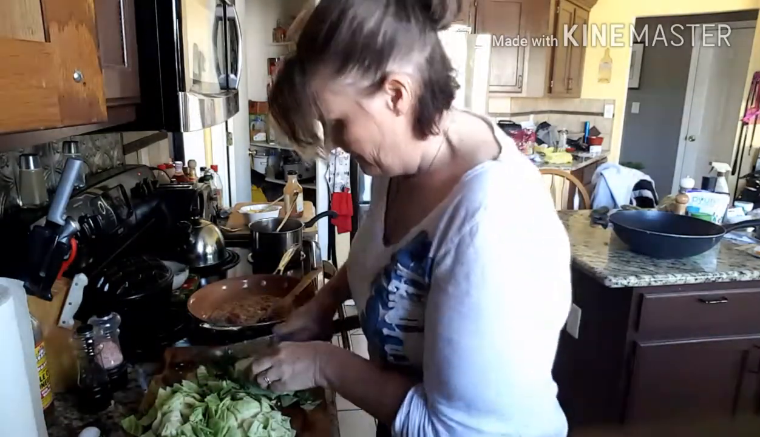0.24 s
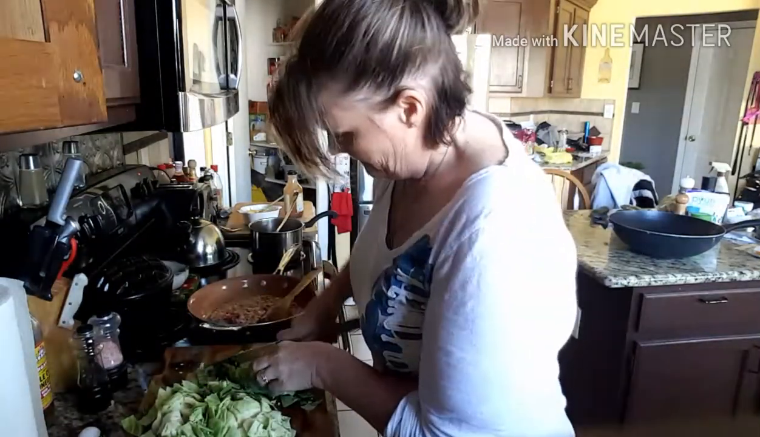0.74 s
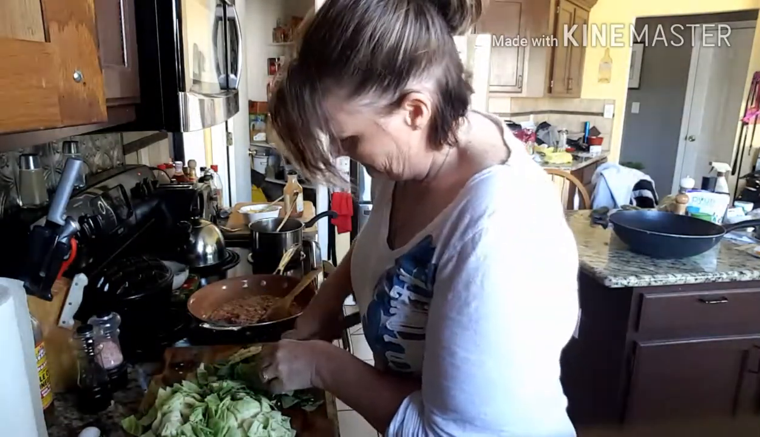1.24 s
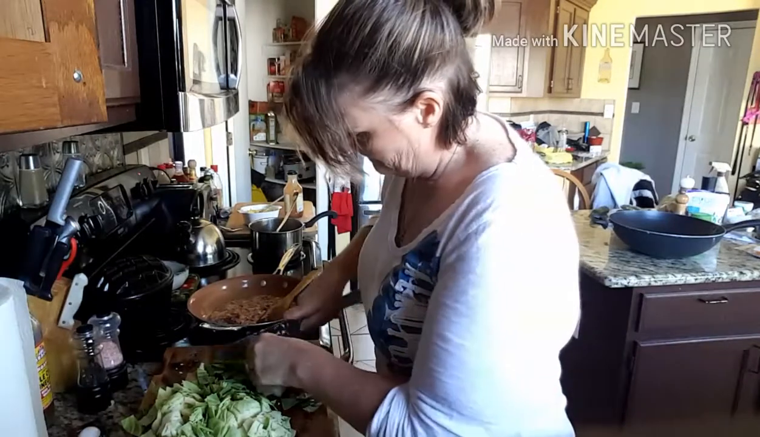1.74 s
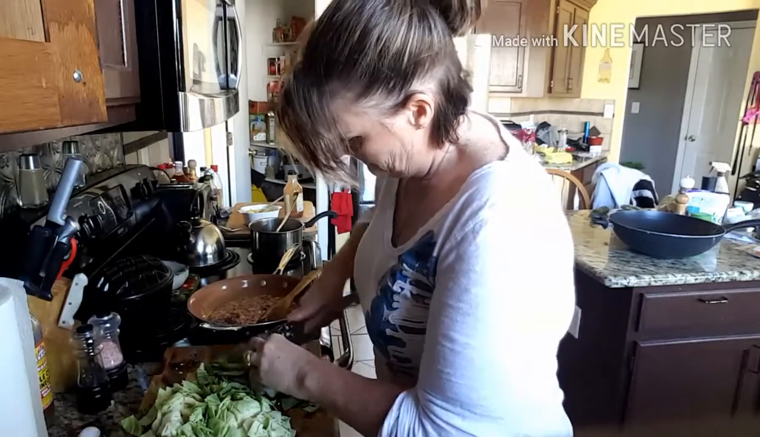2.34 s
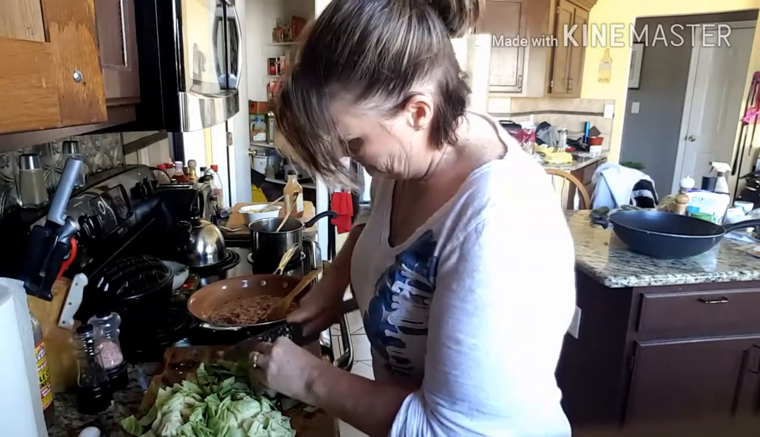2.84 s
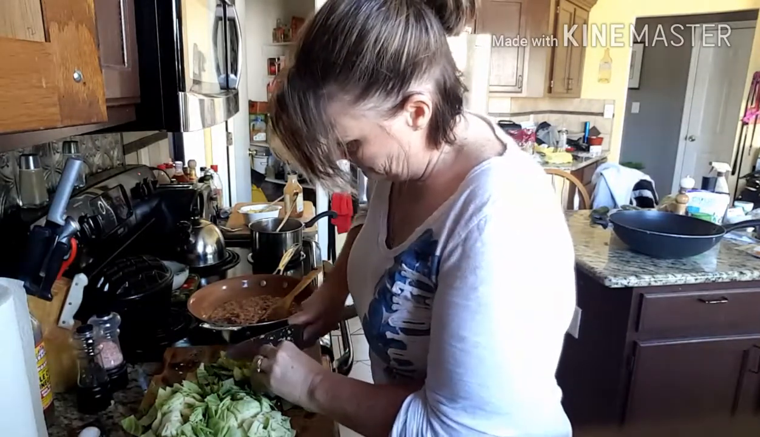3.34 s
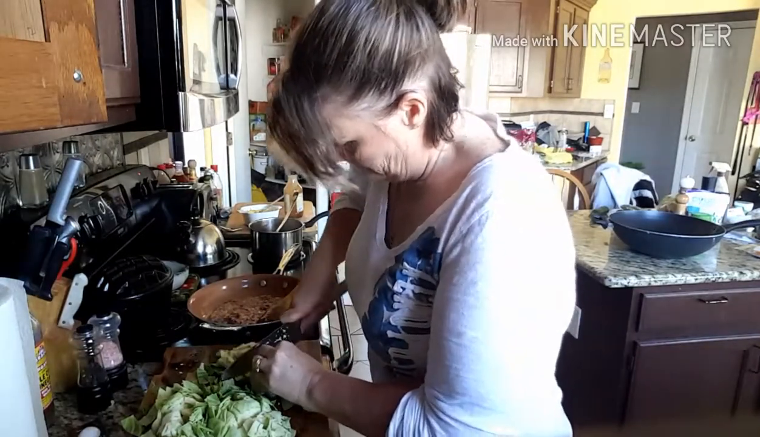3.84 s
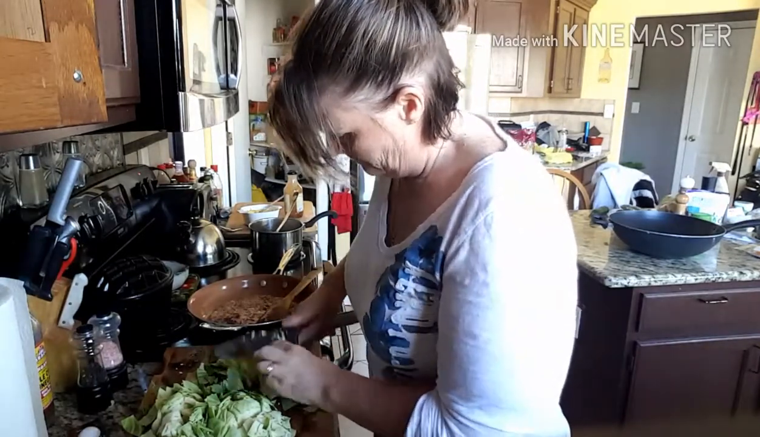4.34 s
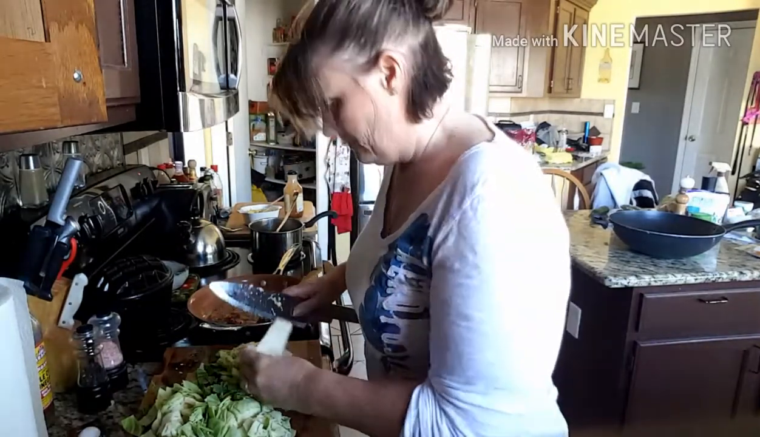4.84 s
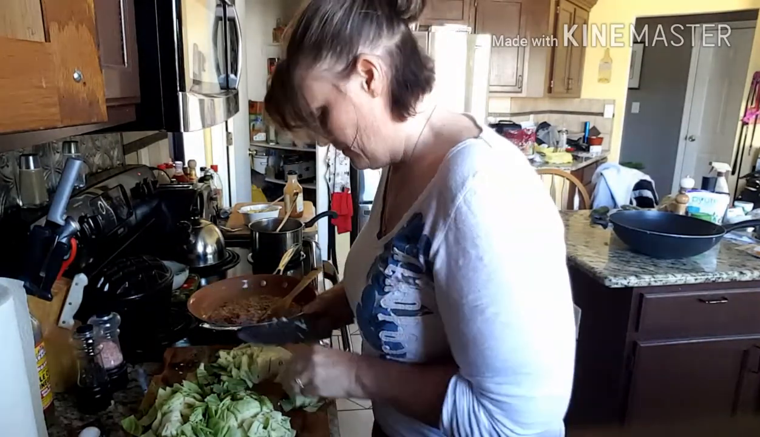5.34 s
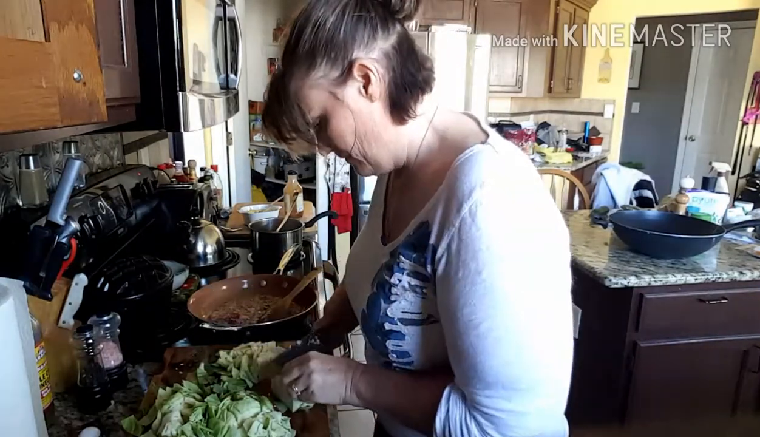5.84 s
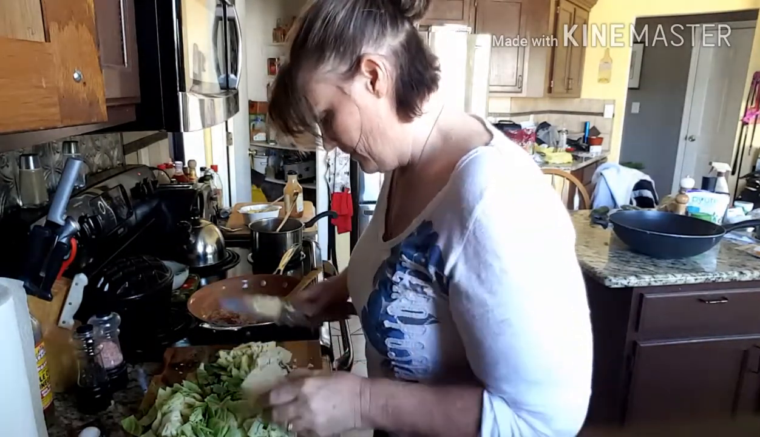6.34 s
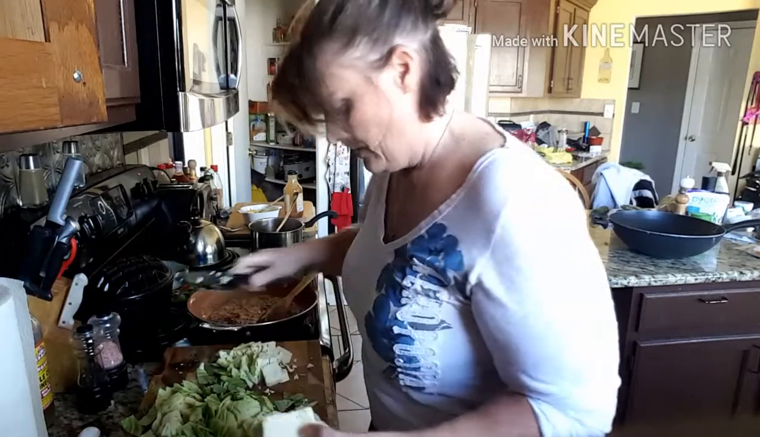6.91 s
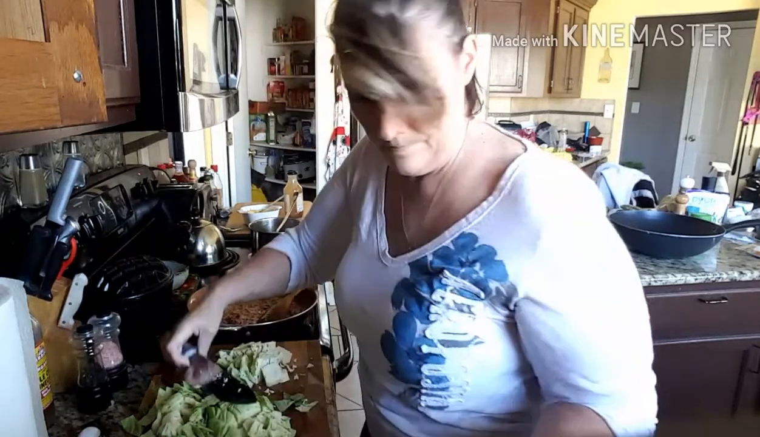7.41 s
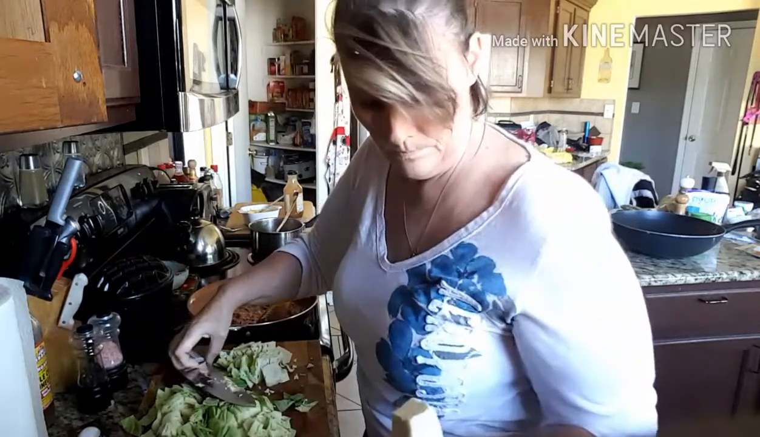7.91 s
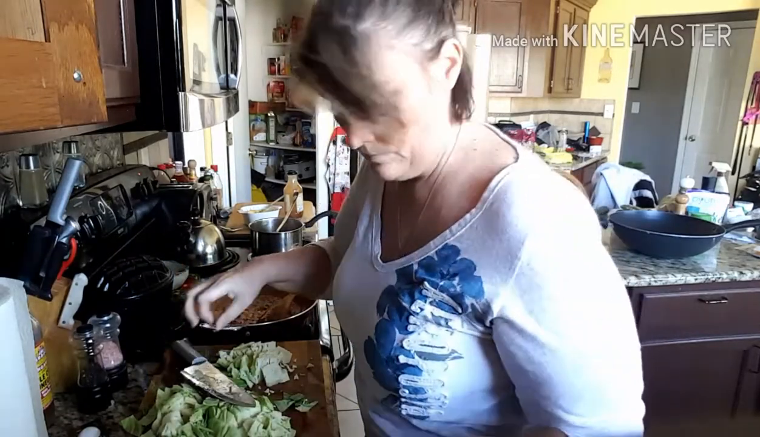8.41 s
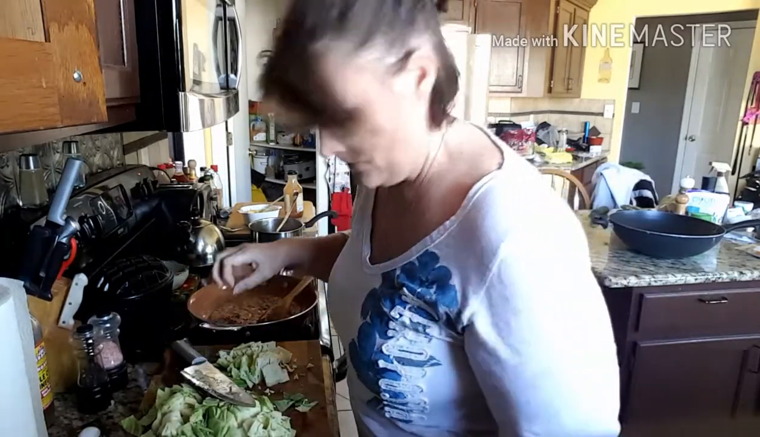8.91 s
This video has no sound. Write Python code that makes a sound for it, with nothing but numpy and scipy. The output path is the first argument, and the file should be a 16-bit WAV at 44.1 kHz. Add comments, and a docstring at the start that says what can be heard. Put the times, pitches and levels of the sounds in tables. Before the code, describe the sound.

Close in a lively home kitchen, a heavy knife chops cabbage on a wooden board: six sharp, woody knocks a little over half a second apart, most preceded by a dull landing on the leaves and a short crunch. Two slower chops follow with rustles and snaps between. Then the flat blade claps down, scrapes briefly and settles with small taps. A low appliance hum and airy hiss continue underneath.

```python
"""A large knife chops cabbage on a wooden board in a home kitchen, quickly at first, then more slowly, and is laid down.
Each stroke drives resonances of board and bench with a short force pulse; most follow a dull landing on the leaves.
Bursts of random clicks make the leaves crunch, snap and crackle; filtered noise makes the appliance's hum and rumble.
Echoes and decaying noise form the kitchen. The left microphone port is nearer, but duller."""
import sys
import numpy as np
from scipy import signal
from scipy.fft import rfft, irfft
from scipy.io import wavfile
from scipy.ndimage import uniform_filter1d

SR = 44100
rng = np.random.default_rng(int(sys.argv[2]) if len(sys.argv) > 2 else 0)


def store_pcm(level_fs):
    """Save levels as 16-bit WAV."""
    pcm = np.round(np.clip(level_fs, -1, 1) * 32767).astype(np.int16)
    wavfile.write(sys.argv[1], SR, np.atleast_2d(pcm).T)


N = 403956
TIME = np.arange(N) / SR

# strokes through the cabbage, timed where the blade meets the board:
# start_s, level_db, contact_cutoff_hz, board_flex_db, blade_clack_db, room_db, cutting_s, crunch_db
STROKES = [(0.1168, -12.5, 2490, -1.5, 5, -7.5, 0.021, -39.5), (0.7114, -5.5, 2600, 0, 1, -6, .028, -37.5),
           (1.2851, -3, 3290, -3.5, 6, -6.5, 0.04, -39), (1.89, -4.5, 2860, 1, 9, -5.5, 0.054, -44.5),
           (2.4539, -6, 3030, 1, 9, -3.5, .025, -38), (3.015, -3.5, 3640, -1, 12, -4, .054, -39),
           (3.9938, -7.5, 2920, 1, 2.5, -7, .066, -37), (5.9778, -9, 3380, 3, 7, -1.5, 0.052, -47)]
# resonances of the board under the edge: pitch_hz, width_hz, level_db
BOARD_MODES = [(228, 52, -14), (370, 23, -49), (508, 220, -10), (596, 128, -0.5), (796, 88, 3.5),
               (919, 101, 4), (1075, 75, 6), (1310, 880, -11.5), (1660, 490, -3.5), (2197, 333, -7),
               (2384, 590, -17.5), (2700, 400, -20.5), (3850, 190, -25), (3960, 2500, -26.5)]
# resonances of the knife lying flat: pitch_hz, width_hz, level_db
KNIFE_MODES = [(515, 132, 1), (793, 144, 9), (950, 510, 8), (1370, 190, 3), (1664, 190, 10),
               (2090, 165, 8.5), (2780, 450, 1.5), (4300, 550, 5.5)]
# knife or hand comes down on the cabbage, mostly to line up a stroke: start_s, bench_thump_db, leaf_snap_db
CABBAGE_LANDINGS = [(.055, -53, -34), (.571, -22.5, -34), (1.1239, -22, -32.5), (1.763, -47, -37),
                    (2.293, -36, -41), (2.858, -35, -37), (3.8848, -49, -29.5), (5.462, -29, -48),
                    (5.904, -40, -37)]
# the flat of the knife slaps or settles on the board: start_s, level_db, contact_cutoff_hz, leaf_snap_db
FLAT_SLAPS = [(.2305, -26, 1550, -36), (6.280, -27.5, 4500, -20), (7.5788, -10, 2280, -42),
              (8.002, -38.5, 2500, -39), (8.458, -33.5, 2980, -30), (9.056, -34, 5000, -18)]


def from_db(db):
    """Logarithmic level: 20 dB is a factor of ten in amplitude."""
    return 10 ** (np.asarray(db) / 20)


def rms_one(x):
    """Energy normalisation: scale to rms 1."""
    return x / np.sqrt(np.mean(x ** 2) + 1e-20)


def peak_one(x):
    """Peak normalisation: scale to peak 1."""
    return x / np.abs(x).max()


def at_hz(points, hz):
    """Logarithmic pitch scale: interpolate a table along log frequency."""
    known_hz, values = np.transpose(points)
    return np.interp(np.log(hz + 1), np.log(known_hz), values)


def add(track, s, sound):
    """Superposition: sum a sound into the track from a given second."""
    at = round(s * SR)
    track[..., at:at + sound.shape[-1]] += sound[..., :N - at]


def coloured(x, spectrum, size=4096):
    """Minimum-phase filtering: folding the cepstrum makes the response causal for a given spectrum."""
    log_gain = np.log(from_db(at_hz(spectrum, np.fft.rfftfreq(size, 1 / SR))))
    cepstrum = irfft(log_gain)
    cepstrum[1:size // 2] *= 2
    cepstrum[size // 2 + 1:] = 0
    response = irfft(np.exp(rfft(cepstrum)))
    return signal.oaconvolve(x, response)[:len(x)]


def resonate(x, modes):
    """Modal superposition: parallel damped resonances whose neighbours swing in opposite senses."""
    out = 0
    for hz, width, db in modes:
        r = np.exp(-np.pi * width / SR)   # pole radius: a wider resonance dies sooner
        poles = [1, -2 * r * np.cos(2 * np.pi * hz / SR), r * r]
        gain = from_db(db) * (1 - r * r) / 2
        out = gain * signal.lfilter([1, 0, -1], poles, x + 1e-18) - out
    return out


def chops(vary_db=1.28, detune=0.02):
    """Mode excitation: where and how flat the edge lands mixes flex and clack; returns knocks, room feed, bench."""
    # bench thud: level of a 0 dB chop; dB gained per dB of stroke level, lost per dB of clack
    thud_db, thud_follows, thud_per_clack = -22, 0.46, 0.29
    direct, to_room, bench = np.zeros((3, N))
    for s, level_db, cut_hz, flex_db, clack_db, room_db, _, _ in STROKES:
        weights = [(620, flex_db), (900, 0), (1150, 0), (2000, clack_db)]
        modes = []
        for hz, width, db in BOARD_MODES:
            mode_hz = hz * (1 + rng.normal(0, detune))
            mode_db = db + at_hz(weights, hz) + rng.normal(0, vary_db)
            modes.append((mode_hz, width, mode_db))
        knock = from_db(level_db) * struck(edge(cut_hz), modes)
        add(direct, s, knock)
        add(to_room, s, from_db(room_db) * knock)
        bench_db = thud_db + thud_follows * level_db - thud_per_clack * clack_db
        add(bench, s, from_db(bench_db) * thud(soft_hz=167))
    return direct, to_room, bench


def edge(cut_hz, seat_s=0.0039, seat_db=-13, count=4):
    """Multiple impact: the curved edge seats itself in a few further touches right after the first."""
    touches = signal.unit_impulse(SR // 20)
    for when, size in rng.random((count, 2)):
        touches[int(when * seat_s * SR) + 1] += from_db(seat_db) * (2 * size - 1)
    return signal.oaconvolve(contact(cut_hz, order=4), touches)


def contact(cut_hz, order=3):
    """Contact stiffness: the softer the contact, the lower the cut-off of the force pulse."""
    lowpass = signal.butter(order, min(cut_hz, SR / 3), fs=SR, output="sos")
    return signal.sosfilt(lowpass, signal.unit_impulse(SR // 3) + 1e-18)


def struck(force, modes, crack_db=-3):
    """Impact response: a body's ring joined by the short woody crack of the contact itself; peak 1."""
    crack = resonate(force, [(1180, 1120, 0)])
    return peak_one(peak_one(resonate(force, modes)) + from_db(crack_db) * peak_one(crack))


def thud(soft_hz):
    """Low-mode response: the bench gives way under a blow and swings a few times; peak 1."""
    # resonances of the bench under the board: pitch_hz, width_hz, level_db
    bench_modes = [(100.3, 21.4, -2), (145, 16, -26), (253, 21, -27)]
    return peak_one(resonate(contact(soft_hz, order=5), bench_modes))


def cabbage(landing_juicy_db=4.5):
    """Brittle fracture: leaves snap under the knife, crunch on its way to the board and rustle in the hand."""
    # thick ribs snap: start_s, level_db, low_crackle_db
    rib_snaps = [(.142, -24.5, -11), (1.867, -15.5, 9), (2.7666, -23.5, -8), (3.5527, -31.5, 1),
                 (4.2656, -34, -10), (4.752, -31, -10), (7.01, -31, -12), (7.238, -33.5, -9),
                 (7.833, -31.5, 1.5)]
    # the hand shifts the leaves: start_s, length_s, level_db
    leaf_shifts = [(2.376, 0.019, -43), (5.11, 0.036, -45.5), (5.452, 0.038, -47), (6.202, 0.032, -47),
                   (6.268, 0.022, -42), (6.622, 0.025, -45), (6.678, 0.033, -49.5)]
    crunch_juicy_db, rustle_juicy_db, slap_juicy_db = 4.5, -4, -0.5   # low crackle
    overrun_s = 0.0045   # the last leaves part just after the knock
    out = np.zeros(N)
    for s, *_, cutting_s, db in STROKES:
        add(out, s - cutting_s, from_db(db) * crunch(cutting_s + overrun_s, crunch_juicy_db))
    for s, length_s, db in leaf_shifts:
        add(out, s, from_db(db) * crunch(length_s, rustle_juicy_db))
    for s, _, db in CABBAGE_LANDINGS:
        add(out, s, from_db(db) * snap(landing_juicy_db))
    for s, *_, db in FLAT_SLAPS:
        add(out, s, from_db(db) * snap(slap_juicy_db))
    for s, db, juicy_db in rib_snaps:
        add(out, s, from_db(db) * snap(juicy_db))
    return out


def crunch(length_s, juicy_db, swell=0.41, release_s=0.0075, clump_db=2.0):
    """Progressive fracture: crackle swells in clumps as the leaves are pressed, and stops quickly."""
    t = np.arange(SR // 8) / SR
    release = np.exp(-np.maximum(t - length_s, 0) / release_s)
    bite = np.minimum(t / length_s, 1) ** swell * release
    unevenness = rms_one(uniform_filter1d(rng.standard_normal(len(t)), size=200))
    layers = from_db(clump_db * unevenness)   # leaf after leaf gives way
    return leaf(bite * layers * grains(t, per_s=3000, spread_db=1.9), juicy_db)


def snap(juicy_db, decay_s=0.0043, rise_s=0.0024):
    """Sudden fracture: one rib breaks in a brief burst of cells; peak 1."""
    t = np.arange(SR // 8) / SR
    burst = grains(t, per_s=14000, spread_db=2.5) * np.exp(-t / decay_s) * (1 - np.exp(-t / rise_s))
    rib_mode = (rng.uniform(5100, 8400), 1500, -2)   # every rib has a pitch of its own
    burst = burst + resonate(burst, [rib_mode])
    return peak_one(leaf(burst, juicy_db))


def grains(t, per_s, spread_db):
    """Random impulse process: bursting cells click at random moments with uneven sizes; rms 1."""
    size_db = spread_db * np.minimum(rng.exponential(1, len(t)), 4)
    sizes = from_db(size_db) * rng.choice([-1, 1], len(t))
    return rms_one(sizes * (rng.random(len(t)) < per_s / SR))


def leaf(clicks, juicy_db):
    """Spectral shaping by thickness: thin leaves sound crisp, thick ribs add a lower crackle."""
    # spectrum of thin leaves: pitch_hz, level_db
    crisp = [(300, -39.5), (1500, -7), (3000, 6.5), (6000, 5), (9000, 3.5), (16000, 1)]
    # spectrum of thick ribs: pitch_hz, level_db
    juicy = [(150, -9), (600, -12), (1200, -7.5), (2100, 0), (3400, -1), (6000, -12.5), (16000, -37)]
    return coloured(clicks, crisp) + from_db(juicy_db + 8.5) * coloured(clicks, juicy)


def thumps():
    """Soft impact: landings, taps and pushes excite mostly the lowest modes; returns board and bench."""
    # light taps on bare wood: start_s, level_db, contact_cutoff_hz
    wood_taps = [(3.186, -40.5, 494), (3.615, -39, 1080), (4.883, -45, 750), (7.077, -43, 1300),
                 (8.868, -42.5, 400), (8.888, -32.5, 480), (9.055, -30.5, 1230)]
    # the softer the tap, the more it moves the bench: contact_cutoff_hz, thump_over_knock_db
    tap_thump = [(400, 10.5), (500, 0.5), (1200, -10)]
    # knock through the leaves: cut-off, level under a 0 dB thump, dB per dB of thump
    landing_cut_hz, landing_knock_db, landing_growth = 447, 5, 1.74
    push_lead_s, push_db = 0.0331, -38.5   # the blade's push rocks the bench shortly before each knock
    board, bench = np.zeros((2, N))
    swing = thud(soft_hz=146)
    blows = []
    for s, thump_db, _ in CABBAGE_LANDINGS:
        blows.append((s, thump_db, landing_knock_db + landing_growth * thump_db, landing_cut_hz))
    for s, knock_db, cut_hz in wood_taps:
        blows.append((s, knock_db + at_hz(tap_thump, cut_hz), knock_db, cut_hz))
    for s, thump_db, knock_db, cut_hz in blows:
        knock = peak_one(resonate(contact(cut_hz, order=5), BOARD_MODES))
        add(board, s, from_db(knock_db) * knock)
        add(bench, s, from_db(thump_db) * swing)
    for s, *_ in STROKES:
        add(bench, s - push_lead_s, from_db(push_db) * swing)
    return board, bench


def slaps():
    """Plate impact: the side of the blade claps on the wood, exciting the knife's own modes, and bounces once."""
    bounce_s, bounce_db = 0.0064, -9.5
    out = np.zeros(N)
    for s, level_db, cut_hz, _ in FLAT_SLAPS:
        clap = from_db(level_db) * struck(contact(cut_hz, order=6), KNIFE_MODES)
        add(out, s, clap)
        add(out, s + bounce_s, from_db(bounce_db) * clap)
    return out


def slide(damping=1.6, dull_hz=2600):
    """Friction noise: the flat blade is pushed a little way over the board, which damps its ring, and stops."""
    start_s, attack_s, fade_db_per_s, level_db = 7.79, 0.11, 77, -50
    t = TIME - start_s
    fade = from_db(-fade_db_per_s * np.maximum(t - attack_s, 0))
    speed = np.clip(t / attack_s, 0, 1) * fade
    rubbing = signal.oaconvolve(rng.standard_normal(N), contact(dull_hz))[:N]
    damped_modes = [(hz, damping * width, db) for hz, width, db in KNIFE_MODES]
    return from_db(level_db) * speed * rms_one(resonate(rubbing, damped_modes))


def loose_leaves(crackle_db=-62, count=14):
    """Random relaxation: the heap crackles, with stray snaps while handled, and calms as it is let go."""
    handling_ends_s, fade_s, resting_share = 7.5, 0.64, 0.31   # left alone, the leaves crackle less
    stray_db, stray_spread_db, stray_juicy_db = -36, 6, -5   # small ribs that give way at random
    activity = np.interp(TIME, [handling_ends_s - fade_s, handling_ends_s], [1, resting_share])
    crackle = leaf(grains(TIME, per_s=170, spread_db=2.0), juicy_db=1.5)
    out = from_db(crackle_db) * activity * crackle
    for k, (when, size) in enumerate(rng.random((count, 2))):
        s = (k + when) / count * handling_ends_s
        snap_db = stray_db + stray_spread_db * (2 * size - 1)
        add(out, s, from_db(snap_db) * snap(stray_juicy_db))
    return out


def near_paths(scatter_db=-12, scatter_s=0.0007, dull_hz=3000, size=1024):
    """Propagation delay: direct sound is later at the right port; clutter scatter and duller echoes follow."""
    # echoes off worktop, cupboards and wall, each from its own side: delay_ms, right_later_ms, left_db, right_db
    echoes = [(1.95, 0.12, -10.5, -1.5), (4.9, 0.062, -9, -6), (7.55, -0.11, -5, -8)]
    right_lag_ms = 0.54
    hz, t = np.fft.rfftfreq(size, 1 / SR), np.arange(size) / SR
    per_ms = -2j * np.pi * hz / 10 ** 3   # phase turn of one millisecond's delay
    clutter = rng.standard_normal((2, size)) * t * np.exp(-2 * t / scatter_s)
    clutter = rms_one(clutter) / np.sqrt(size)
    paths = np.exp(per_ms * [[0], [right_lag_ms]]) + from_db(scatter_db) * rfft(clutter)
    for ms, later_ms, left_db, right_db in echoes:
        delays = np.exp(per_ms * [[ms], [ms + later_ms]])
        paths += from_db([[left_db], [right_db]]) * delays / (1 + 1j * hz / dull_hz)
    return irfft(paths)


def room_tail(build_s=0.0096, size=32768):
    """Diffuse-field decay: kitchen reverberation dies band by band; both ports share its bass."""
    # colour of the reverberation: pitch_hz, level_db
    room_colour = [(80, -11), (170, 0), (245, 7.5), (400, 1.5), (620, -5), (1050, -3), (2100, -4.5),
                   (3100, -6), (8000, -2), (15000, -4.5)]
    # time to fall by 60 dB: pitch_hz, decay_s
    decay_times = [(100, 0.39), (250, 0.33), (600, 0.41), (1100, 0.35), (2100, 0.44), (3200, 0.42),
                   (14000, 0.25)]
    t, hz = np.arange(size) / SR, np.fft.rfftfreq(size, 1 / SR)
    mid, side = np.exp(2j * np.pi * rng.random((2, len(hz))))
    alike = 1 / (1 + (hz / 800) ** 3)   # likeness of the two ports
    noise = np.sqrt(1 + alike) * mid + np.sqrt(1 - alike) * side * [[1], [-1]]
    centres, tail = [row[0] for row in decay_times], 0
    for (_, t60), weights in zip(decay_times, np.eye(len(centres))):
        band = irfft(noise * at_hz(list(zip(centres, weights)), hz))
        tail = tail + band * from_db(-60 * t / t60)
    tail = tail * (1 - np.exp(-(t / build_s) ** 2))   # gradual onset
    return np.array([coloured(rms_one(port), room_colour) for port in tail]) / np.sqrt(size)


def background(rumble_db=-56, hiss_db=-53, hum_width_hz=9.6):
    """Filtered noise: an appliance's rumble and wavering narrow-band hum, with an airy hiss unlike at each port."""
    # appliance rumble: pitch_hz, level_db
    rumble_spectrum = [(20, -37), (35, -12), (55, 2), (78, -1), (100, 7), (120, 0.5), (150, -9.5),
                       (260, -22), (400, -26), (560, -13), (900, -29), (2000, -54)]
    # airy hiss: pitch_hz, level_db
    hiss_spectrum = [(40, -5), (160, -18), (260, 2.5), (370, -1.5), (500, -7.5), (800, 6.5), (1300, -1.5),
                     (2000, 9.5), (3200, -1), (4500, 0.5), (9000, 2.5), (15000, -3.5)]
    # appliance hum: pitch_hz, level_db
    hum_tones = [(97, -76), (219, -71), (267, -71), (473, -67.5), (608, -74)]
    white = rng.standard_normal((4, N))
    rumble = from_db(rumble_db) * rms_one(coloured(white[0], rumble_spectrum))
    hum = sum(from_db(db) * rms_one(resonate(white[1], [(hz, hum_width_hz, 0)])) for hz, db in hum_tones)
    hiss = np.array([coloured(port, hiss_spectrum) for port in white[2:]])
    return rumble + hum + from_db(hiss_db) * rms_one(hiss)


def scene(room_db=5.0, leaf_room_db=-4.5, tap_room_db=-8.0, chop_boom_db=-3.0, thump_boom_db=-8.5):
    """Direct and reverberant fields: board sounds reach the ports by both; the bench booms alike in both ports."""
    knocks, knocks_to_room, hard_thuds = chops()
    soft_knocks, soft_thuds = thumps()
    leaves = cabbage() + loose_leaves()
    taps = soft_knocks + slaps() + slide()
    to_room = knocks_to_room + from_db(leaf_room_db) * leaves + from_db(tap_room_db) * taps
    to_room += from_db(chop_boom_db) * hard_thuds + from_db(thump_boom_db) * soft_thuds
    near = signal.oaconvolve((knocks + leaves + taps)[None], near_paths(), axes=1)[:, :N]
    far = signal.oaconvolve(to_room[None], room_tail(), axes=1)[:, :N]
    return near + hard_thuds + soft_thuds + from_db(room_db) * far + background()


def record(dry, low_cut_hz=38, top_cut_hz=15300):
    """Band limiting and soft saturation: coloured ports lose the deepest bass, high peaks are rounded, the top is cut."""
    # colour of the left microphone port: pitch_hz, level_db
    left_port = [(120, 0), (250, 3.5), (400, 8), (620, 2.5), (1100, 5.5), (1550, 0.5), (2000, -6.5),
                 (3000, 2), (4500, -0.5), (6500, -5), (8500, -19), (10500, -19), (13000, -7.5),
                 (16000, -36)]
    # colour of the right microphone port: pitch_hz, level_db
    right_port = [(120, 0), (250, 8.5), (400, 4), (620, 7.5), (1150, 0.5), (1550, 4.5), (2000, 0.5),
                  (3000, 3.5), (4500, 0.5), (16000, -3)]
    ports = np.array([coloured(dry[0], left_port), coloured(dry[1], right_port)])
    ports = signal.sosfilt(signal.butter(2, low_cut_hz, "high", fs=SR, output="sos"), ports)
    rounded = ports / (1 + ports ** 4) ** (1 / 4)
    return signal.sosfilt(signal.ellip(10, .2, 80, top_cut_hz, fs=SR, output="sos"), rounded)


dry = scene()
out = record(dry)
store_pcm(out)
```